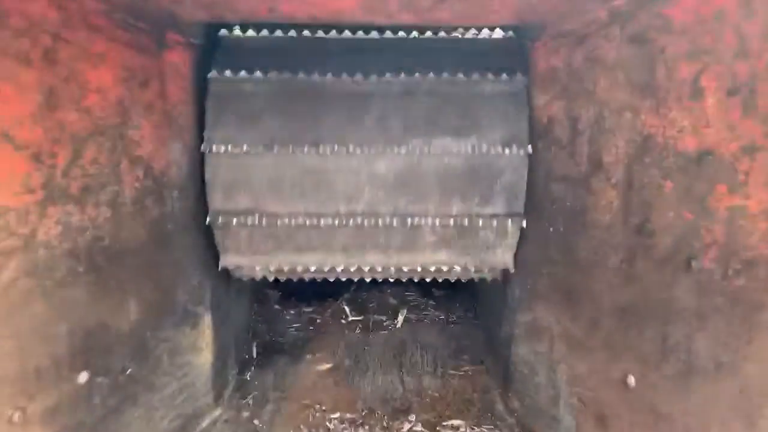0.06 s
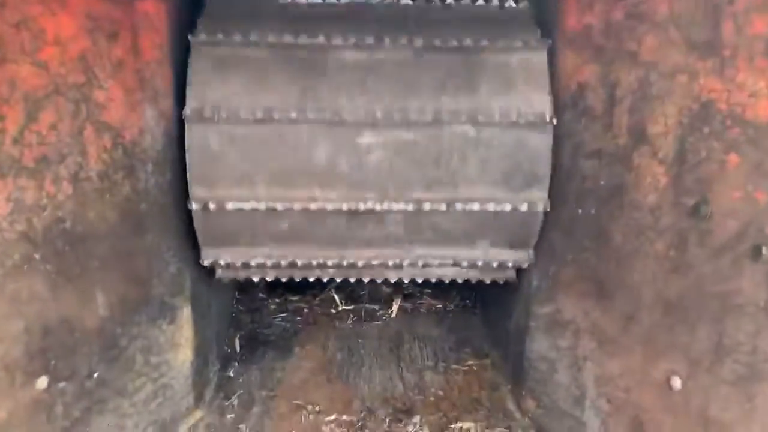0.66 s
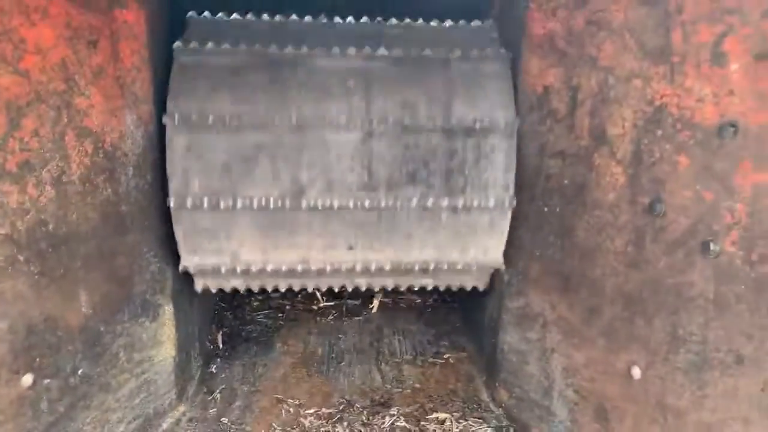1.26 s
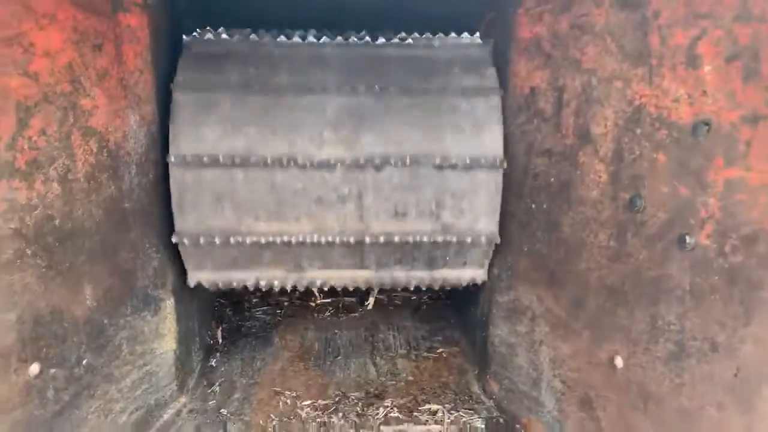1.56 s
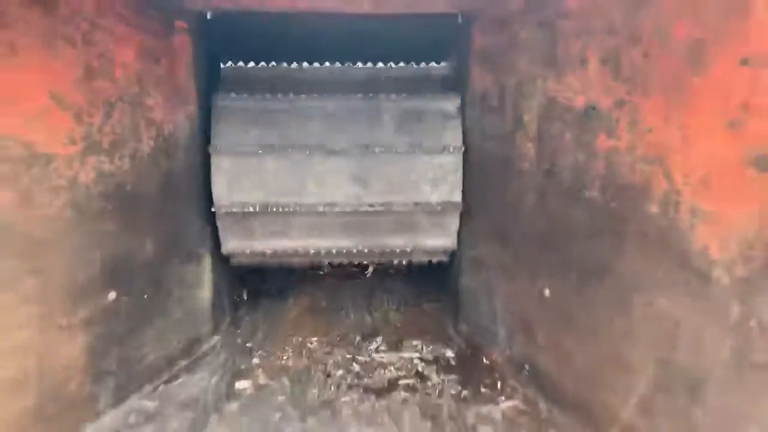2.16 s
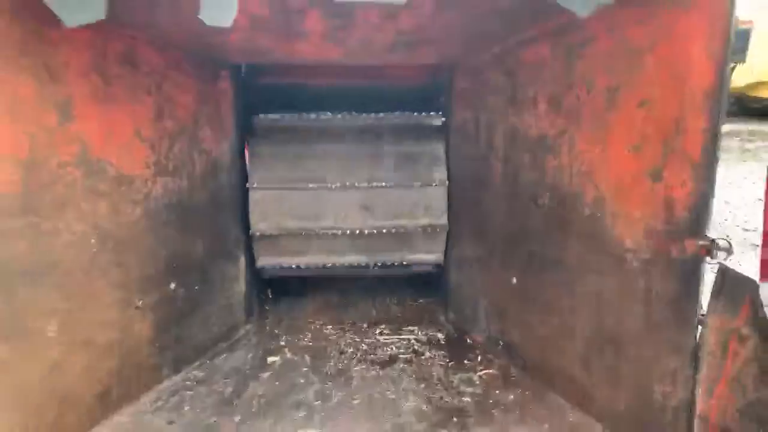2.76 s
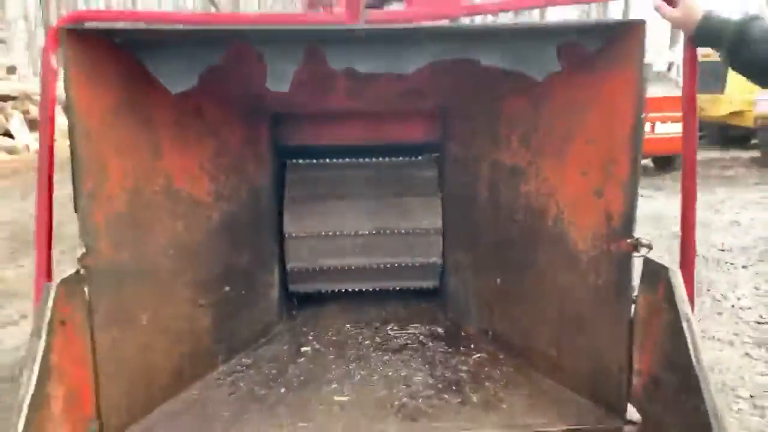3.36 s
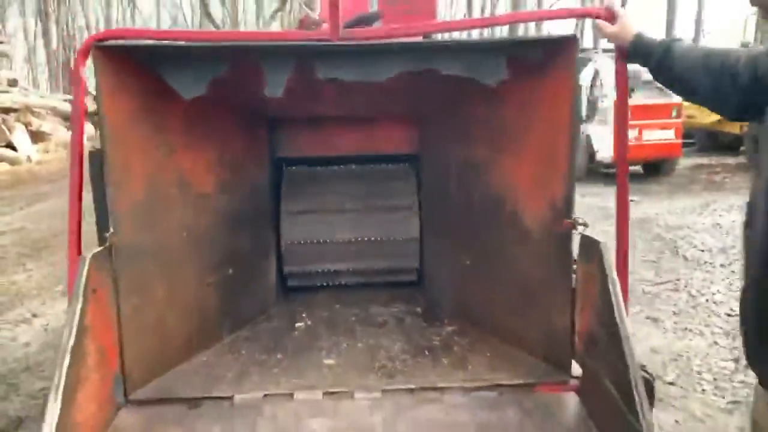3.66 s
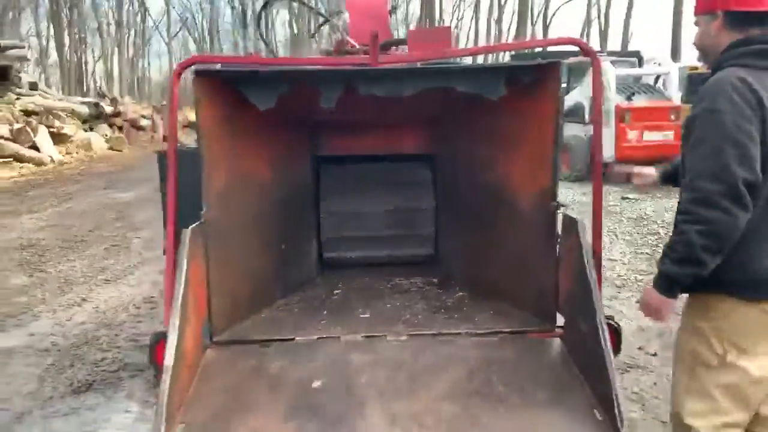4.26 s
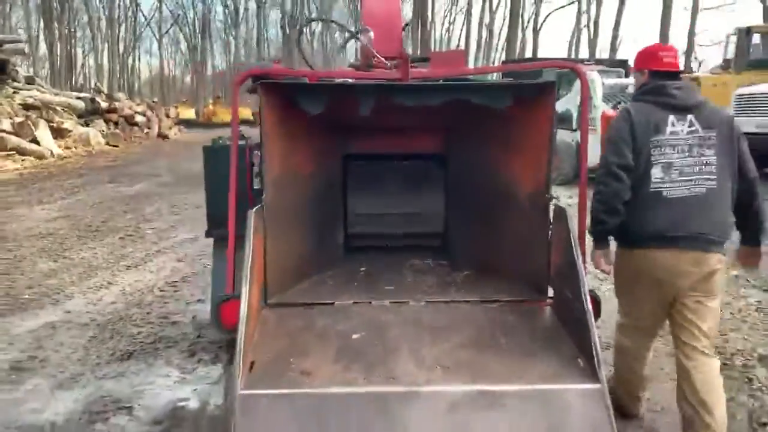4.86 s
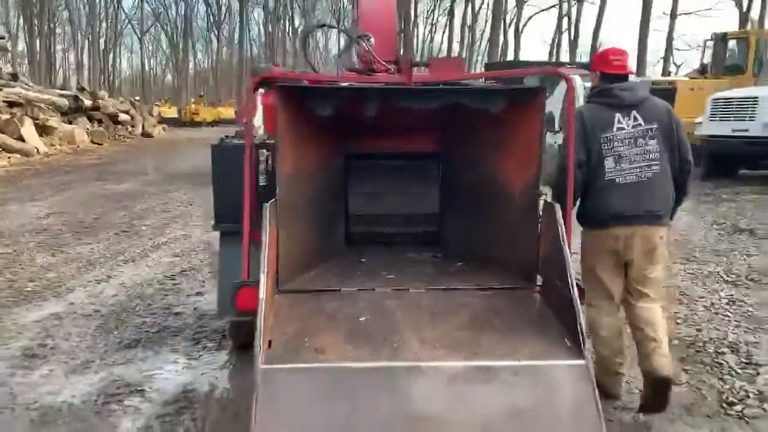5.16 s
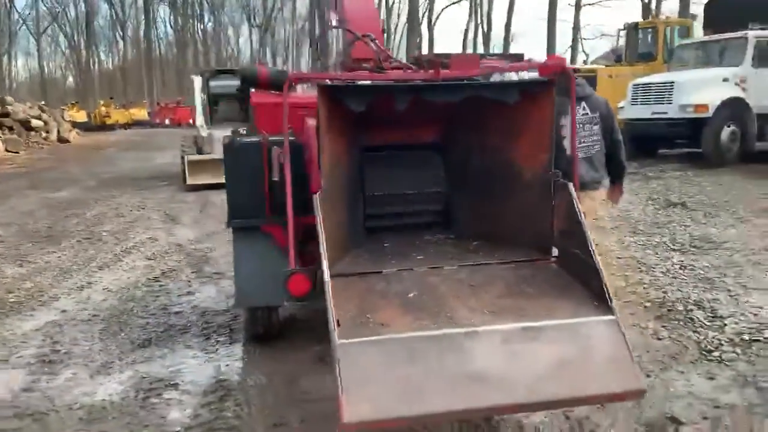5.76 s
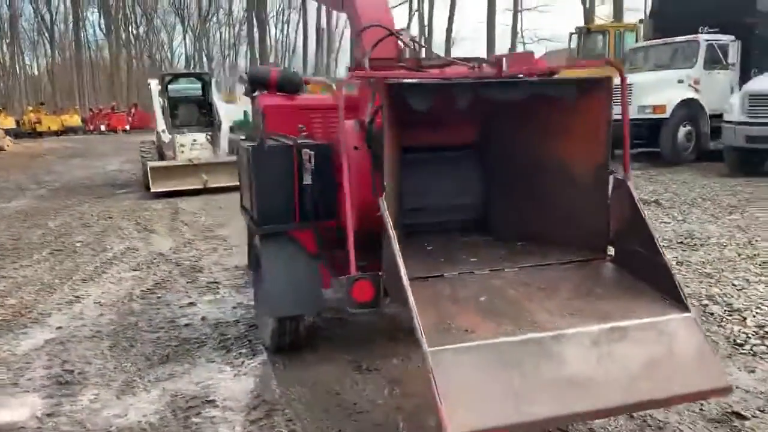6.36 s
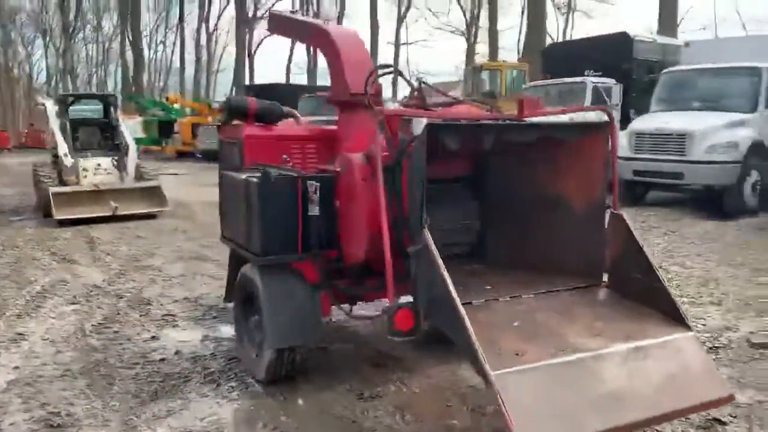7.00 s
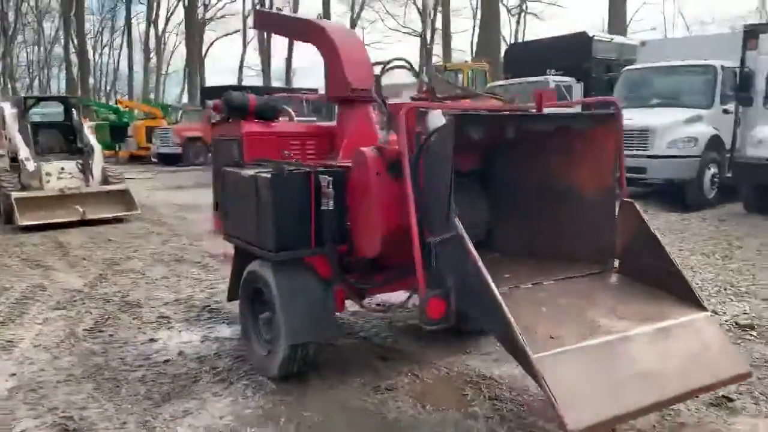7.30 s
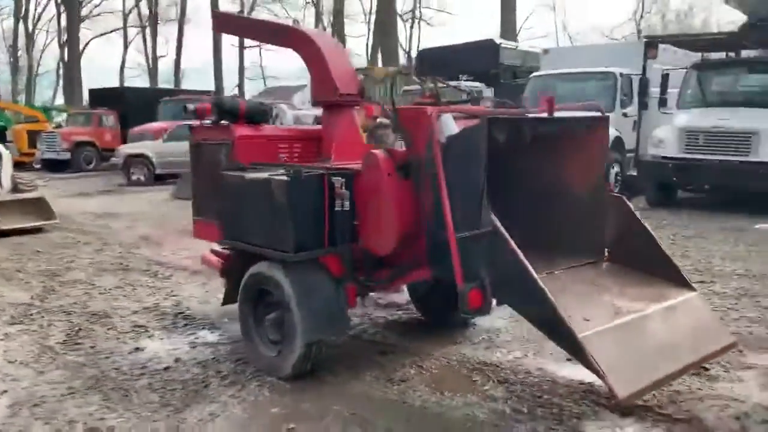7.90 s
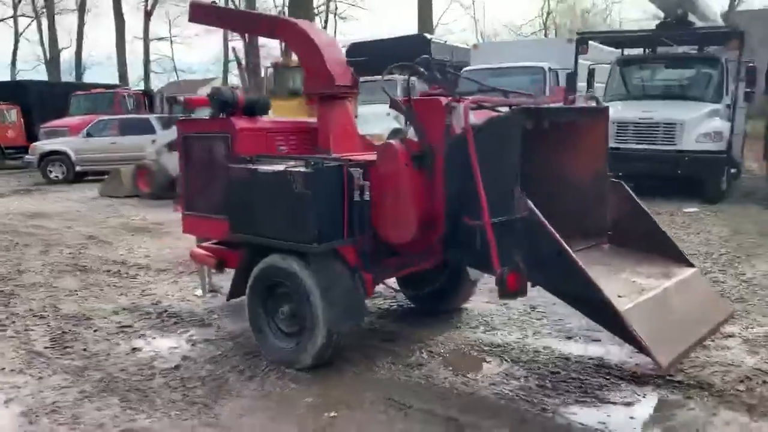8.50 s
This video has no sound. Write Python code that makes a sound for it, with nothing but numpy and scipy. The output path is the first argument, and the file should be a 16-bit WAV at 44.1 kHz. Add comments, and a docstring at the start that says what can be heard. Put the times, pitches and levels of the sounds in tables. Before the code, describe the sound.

A wood chipper drones and throbs as it winds down to idle, with a metallic hiss, small ticks and a couple of clanks.

```python
"""A drum chipper winds down to idle in a yard as the listener backs out of its steel hopper and walks
round to its side. Two knives snap past the anvil and beat the air into the hopper's resonances; the
belted engine throbs and ticks at a fixed ratio to the drum. The steelwork booms as the listener passes.
Chips tick and the feed roller hisses until it stops with a clank; later, loose fittings chink and
gravel shifts underfoot."""
import sys
import numpy as np
from scipy import signal
from scipy.fft import rfft, irfft, next_fast_len
from scipy.io import wavfile
from scipy.ndimage import uniform_filter1d, map_coordinates

SR = 44100
rng = np.random.default_rng(int(sys.argv[2]) if len(sys.argv) > 2 else 0)


def store_pcm(level_fs):
    """Save levels as 16-bit WAV."""
    pcm = np.round(np.clip(level_fs, -1, 1) * 32767).astype(np.int16)
    wavfile.write(sys.argv[1], SR, np.atleast_2d(pcm).T)


N = 381024
TIME_S = np.arange(N) / SR
APPROACH_S = 5.18  # the engine starts to come out from behind the hopper


def amp(db):
    """Decibels to gain."""
    return 10 ** (np.asarray(db) / 20)


def unit(x):
    """Scale to rms 1."""
    return x / np.sqrt(np.mean(x ** 2) + 1e-20)


def along(points, hz):
    """Read a curve of (freq_hz, value) points on a log frequency axis."""
    freqs, values = np.transpose(points)
    return np.interp(np.log(hz + 1), np.log(freqs + 1), values)


def wobble(rate):
    """A smooth random curve with `rate` knots a second."""
    knots = rng.standard_normal(int(N * rate / SR) + 4)
    return map_coordinates(knots, [np.arange(N) * rate / SR], order=2)


def filtered(x, response):
    """Shape x with a frequency response."""
    size = next_fast_len(N + SR // 2)
    return irfft(rfft(x, size) * response(np.fft.rfftfreq(size, 1 / SR)), size)[..., :N]


def coloured(x, colour):
    """EQ x with a (freq_hz, level_db) curve and scale to rms 1."""
    return unit(filtered(x, lambda hz: amp(along(colour, hz))))


def passing(peak_s, half_s, lift_db):
    """A lift in dB that swells and falls as the listener goes by."""
    return lift_db * np.exp(-((TIME_S - peak_s) / half_s) ** 2)


# The listener's standpoints at the hopper's throat, mouth, front and side: time_s
STANDPOINTS = [.8, 2.85, 4.25, 7.0]


def on_the_way(values, t=TIME_S):
    """Glide through one value per standpoint."""
    return np.interp(t, STANDPOINTS, values)


def walk(x, spectra, ripple_db=0, size=8192, ripple_bins=9, ripple_frames=4):
    """An EQ that glides between standpoints; echoes off the steel can add a fine, shifting ripple."""
    hz, t, frames = signal.stft(x, SR, nperseg=size)
    ripple = uniform_filter1d(rng.standard_normal((len(t), len(hz))), ripple_bins)
    ripple = unit(uniform_filter1d(ripple, ripple_frames, axis=0))
    shares = np.array([on_the_way(row, t) for row in np.eye(len(spectra))])
    eq_db = ripple_db * ripple + shares.T @ [along(points, hz) for points in spectra]
    cepstra = irfft(np.log(amp(eq_db)))
    causal = np.r_[1, np.full(size // 2 - 1, 2), 1, np.zeros(size // 2 - 1)]  # ring follows the hit
    log_gain = rfft(cepstra * causal)
    return signal.istft(frames * np.exp(log_gain.T), SR, nperseg=size)[1][..., :N]


# How alike the two ears are: freq_hz, correlation
EAR_LIKENESS = [(60, 0.9), (290, 0.94), (640, 0.75), (1400, 0.95), (3100, 0.057), (6800, 0.064),
                (9000, 0.46), (11000, 1)]


def stereo_noise():
    """White noise of rms 1, widest in the lower treble and nearly mono in the bass and at the top."""
    def mid_side(hz):
        angle = np.arccos(np.clip(along(EAR_LIKENESS, hz), -1, 1)) / 2
        return np.array([np.cos(angle), np.sin(angle)])
    mid, side = filtered(rng.standard_normal((2, N)), mid_side)
    return np.array([mid + side, mid - side])


def coasting(base_hz=55.215, sag_hz_per_s=1.279, drop_hz=5.697, drop_at_s=4.475, drop_half_s=1.919):
    """Knife passes per second: the heavy drum sags steadily and drops further as the throttle closes."""
    throttle_closed = (1 + np.tanh((TIME_S - drop_at_s) / drop_half_s)) / 2
    return base_hz - sag_hz_per_s * TIME_S - drop_hz * throttle_closed


# Tone of the knife beat at each standpoint: pitch_hz, level_db
BEAT_THROAT = [(54, -32), (108, -23), (162, -20), (215, -23), (270, -23), (322, -18), (377, -30),
               (441, -28), (490, -34.5), (570, -40.5), (690, -43), (850, -51), (925, -37.5), (1030, -87),
               (1230, -43.5), (1900, -58)]
BEAT_MOUTH = [(51, -47), (102, -25.5), (153, -28.5), (204, -27), (255, -38), (308, -19.5), (357, -25.5),
              (408, -34), (490, -27), (600, -49.5), (1400, -54.5), (1900, -59)]
BEAT_FRONT = [(47, -87), (93, -34.5), (140, -58.5), (186, -40), (233, -36), (280, -43.5), (373, -41),
              (430, -35), (468, -29), (520, -47), (575, -38), (680, -63.5), (1030, -46.5), (1700, -87)]
BEAT_SIDE = [(42, -56), (82, -53), (119, -41.5), (165, -40.5), (200, -56), (245, -43), (275, -44.5),
             (315, -37), (355, -48.5), (400, -50.5), (470, -52), (1200, -65)]
# Once-a-turn partials against the knife beat, per standpoint: offset_db
TURN_DB = [-17.5, -20.5, -9, -5.5]
# Blur from stray echoes at 500 Hz, per standpoint: phase_spread_rad
ECHO_BLUR = [.15, .2, .45, 1.6]
# Hopper resonances that hold back and smear each pulse: pitch_hz, width_hz
HOPPER_MODES = [(78, 37), (215, 113), (300, 51.5), (760, 280)]
# Steelwork booms that swell in passing: pitch_hz, width_hz, peak_s, half_length_s, lift_db
BOOMS = [(55, 20, 0.1, 0.8, 2), (80, 18, 0.91, 1.4, 11), (106, 24, 1.63, 0.62, 3),
         (383.5, 39, 1.7, 0.97, 6.5), (476, 85, 0.26, 0.68, 11), (356, 160, 3.46, 0.48, 3.5),
         (168.2, 26, 4.14, 1, 28), (308, 48, 5.4, 0.8, 9.5), (306, 67, 6.37, 0.47, 4.5),
         (167.3, 12, 6.21, 0.56, 9.5), (264, 37, 6.55, 0.26, 9.5), (339, 39, 6.42, 0.49, 8),
         (296, 16, 8.12, 0.74, 11), (398, 42, 7.5, 0.92, 10), (700, 200, .1, .5, 6.5),
         (225, 36, 5.3, 0.65, 4), (320, 40, 1.7, 0.55, 2.5), (385, 110, 4.94, .4, 3.5)]
# Hollows where a wall echo cancels the direct sound: pitch_hz, width_hz, peak_s, half_length_s, dip_db
HOLLOWS = [(255.5, 77, 2.38, 0.61, 8.5), (203, 40, 2.8, 0.51, 11), (424, 55, 1.87, 0.45, 9),
           (584, 64, 1.5, 0.32, 15), (540, 50, 3.54, 0.37, 9), (337, 43, 5.24, 0.2, 8),
           (500, 160, 8.4, 1, 13), (447, 54, 5.4, 0.63, 4.5)]


def knives(passes, rate_hz, travel_s=0.001585, waver_db_per_hz=1.9 / 500, step=7):
    """Two unequal knives beat the air: strong partials at the knife rate, weaker ones between them."""
    t, passes, rate_hz = TIME_S[::step], passes[::step], rate_hz[::step]
    bands = [(centre, width, passing(*swell)[::step]) for centre, width, *swell in BOOMS]
    bands += [(centre, width, -passing(*dip)[::step]) for centre, width, *dip in HOLLOWS]
    shares = [on_the_way(row, t) for row in np.eye(len(STANDPOINTS))]
    spectra = [BEAT_THROAT, BEAT_MOUTH, BEAT_FRONT, BEAT_SIDE]
    turn_db, blur = on_the_way(TURN_DB, t), on_the_way(ECHO_BLUR, t)
    beat = np.zeros(len(t))
    for k in range(2, 48):  # harmonics of one drum turn
        hz, odd = k / 2 * rate_hz, k % 2
        db = odd * turn_db + sum(share * along(points, hz) for share, points in zip(shares, spectra))
        db += sum(lift / (1 + (2 * (hz - centre) / width) ** 4) for centre, width, lift in bands)
        # short waves waver most as the listener moves through their standing pattern
        db += waver_db_per_hz * hz * map_coordinates(rng.standard_normal(64), [t * 4], order=2)
        lag = 2 * np.pi * hz * travel_s
        lag += sum(2 * np.arctan2(hz * width, centre ** 2 - hz ** 2) for centre, width in HOPPER_MODES)
        echo_phase = rng.standard_normal() * (np.pi if odd else blur * hz.mean() / 500)
        beat += amp(db) * np.sqrt(2) * np.cos(np.pi * k * passes - lag + echo_phase)
    return signal.resample_poly(beat, step, 1)[:N]


# EQ of a knife's snap at the anvil: freq_hz, gain_db
SNAP_COLOUR = [(300, -36), (650, -18), (900, 5.5), (1000, -7.5), (1220, 4), (1600, 9), (1900, -2),
               (2700, -11.5), (4000, -17), (8000, -21), (15000, -47)]
# Snap fader, per standpoint: level_db
SNAP_DB = [-37.5, -44, -50, -53]


def snaps(passes, rate_hz, spit_decay_s=0.0013, weaker_db=2, scatter_db=1.5, crack_db=18):
    """Each knife skims the anvil with a hard crack and a spit of air; one sits closer than the other."""
    hit = passes.astype(int)
    hit_db = scatter_db * rng.standard_normal(hit[-1] + 1)[hit] - weaker_db * (hit % 2 == 0)
    crack = amp(crack_db) * np.diff(hit, prepend=hit[0])
    spit = stereo_noise() * np.exp(-(passes % 1) / rate_hz / spit_decay_s)
    snap = unit(walk(amp(hit_db) * (crack + spit), [SNAP_COLOUR] * len(STANDPOINTS)))
    up_close_db = passing(peak_s=1.4, half_s=0.36, lift_db=3.8)
    return amp(on_the_way(SNAP_DB) + up_close_db) * snap


# Turbulence in the drum housing, from inside and outside the hopper: freq_hz, density_db
RUMBLE_IN = [(25, -70), (45, -62), (72, -58), (96, -44.5), (130, -54), (168, -44), (210, -57), (320, -51.5),
             (430, -55), (600, -62), (900, -81), (2000, -130)]
RUMBLE_OUT = [(25, -74), (40, -63), (56, -56), (80, -54), (130, -59.5), (170, -54), (220, -57.5),
              (300, -55), (380, -59.5), (500, -64.5), (800, -84), (2000, -130)]
# EQ of the thrown air inside, in front of and beside the hopper: freq_hz, gain_db
WHOOSH_IN = [(350, -21), (600, -4.5), (729, -2), (941, -9.5), (1020, -10.5), (1210, -11), (1350, -12),
             (1450, -8.5), (1860, -18), (2190, -15), (3600, -32), (4680, -39), (7920, -120)]
WHOOSH_FRONT = [(360, -24), (620, -3.5), (653, -6.5), (790, -0.5), (936, -17), (1030, -1.5), (1130, -6.5),
                (1500, -6.5), (2200, -16), (2640, -22), (3600, -30.5), (4680, -62), (7920, -120)]
WHOOSH_SIDE = [(350, -28.5), (500, -16), (600, -6), (708, -4.5), (768, -3.5), (1160, -6.5), (1220, -7),
               (1750, -7.5), (1930, -11.5), (2370, -12), (2830, -20), (3600, -31.5), (4680, -63),
               (7920, -120)]
# Rumble and whoosh faders, per standpoint: gain_db
RUMBLE_DB = [1.1, -1, -1.5, -2.5]
WHOOSH_DB = [-27, -32, -33, -37.5]


def draught(passes):
    """The drum works as a fan: a rumble surges behind each knife, and four paddles chop a whoosh."""
    surge = unit(puffs(passes, decay_cycles=1.0, scatter_db=3) ** on_the_way([0.89, 1, 0.3, 0]))
    turbulence = stereo_noise() * surge * np.sqrt(SR / 2)
    rumble = walk(turbulence, [RUMBLE_IN, RUMBLE_IN, RUMBLE_OUT, RUMBLE_OUT])
    by_housing_db = passing(peak_s=6.5, half_s=0.41, lift_db=2.4)
    depth = 0.34 * on_the_way([0.85, 0.63, 0.73, 0.19])
    chop = np.sqrt(1 - depth + depth * puffs(2 * passes, decay_cycles=0.69, scatter_db=5.5) ** 2)
    whoosh = walk(stereo_noise() * chop, [WHOOSH_IN, WHOOSH_IN, WHOOSH_FRONT, WHOOSH_SIDE], ripple_db=2.5)
    whoosh_db = on_the_way(WHOOSH_DB) + 0.38 + 0.85 * wobble(12)
    return amp(on_the_way(RUMBLE_DB) + by_housing_db) * rumble + amp(whoosh_db) * unit(whoosh)


def puffs(cycles, decay_cycles, scatter_db):
    """An envelope of rms 1 that jumps to a random height once a cycle, then decays."""
    heights = amp(scatter_db * rng.uniform(-1, 1, int(cycles[-1]) + 1))
    return unit(heights[cycles.astype(int)] * np.exp(-(cycles % 1) / decay_cycles))


# Faders of the firing tone and its octave, per standpoint: level_db
FIRING_DB = [-36.5, -39.5, -35, -37.5]
OCTAVE_DB = [-43, -36, -85, -38]


def exhaust(passes, firings, sum_peak_db=-22, sum_peak_s=2.3, sum_fade_db_per_s=11.5):
    """The engine's firing tone and octave; firing shakes the drum's second partial into a sum tone."""
    by_engine_db = passing(peak_s=8.7, half_s=0.9, lift_db=3.1)
    sum_db = sum_peak_db - sum_fade_db_per_s * np.abs(TIME_S - sum_peak_s)  # peaks just inside the mouth
    tones = [(on_the_way(FIRING_DB), firings),
             (on_the_way(OCTAVE_DB) + by_engine_db, 2 * firings),
             (sum_db, firings + 2 * passes)]
    return sum(amp(db + 0.71 * wobble(7.7)) * np.sqrt(2) * np.sin(2 * np.pi * cycles)
               for db, cycles in tones)


# Base fader of the metallic hiss, per standpoint: gain_db
HISS_DB = [-48.5, -52.5, -52.5, -56]


def hiss_fader(roller_db=3, roller_stop_s=2.3, runout_s=0.4, approach_db_per_s=2.5):
    """Hiss gain in dB: it drops as the feed roller stops and grows as the engine comes into view."""
    rolling = np.clip(1 - (TIME_S - roller_stop_s) / runout_s, 0, 1)
    approach_db = approach_db_per_s * np.maximum(TIME_S - APPROACH_S, 0)
    return on_the_way(HISS_DB) + roller_db * rolling + approach_db


# EQ of the metallic hiss inside and outside the hopper: freq_hz, gain_db
HISS_IN = [(2000, -0.5), (3300, 3.5), (3900, 0), (4300, 3.5), (5400, -4.5), (6400, -1), (7100, -5),
           (7900, -2), (10000, -7), (12100, -8), (14500, -13), (15700, -23)]
HISS_OUT = [(2000, -36), (3300, -9), (3650, -0.5), (4450, 2.5), (5200, -2.5), (6500, -0.5), (7600, -6),
            (8600, -4), (11000, -11), (14000, -13.5), (15700, -16)]


def clatter(passes, firings, hiss_db, grit_db=0.5):
    """Gritty metallic hiss: chips fly round once a turn in the hopper; injectors tick by the engine."""
    inside, beside = on_the_way([0.8, 0.28, 0.39, 0.088]), on_the_way([0, 0, 0, 1])
    chips = 0.84 * inside * puffs(passes / 2, decay_cycles=0.33, scatter_db=5) ** 2
    injectors = 0.31 * beside * puffs(firings, decay_cycles=0.36, scatter_db=2) ** 2
    envelope = np.sqrt(1.5 + chips + injectors) * amp(grit_db * wobble(2500))
    hiss = walk(stereo_noise() * envelope, [HISS_IN, HISS_IN, HISS_OUT, HISS_OUT], ripple_db=2.5)
    return amp(hiss_db + 2.0 + 1.1 * wobble(32)) * unit(hiss)


# The standout ticks of chips and grit, before the boost: start_s, click_db, fizz_db
TICKS = [(0.016, -46, -41), (0.0862, -47, -43), (0.1201, -42, -44.0), (0.3193, -54, -54.0),
         (0.451, -43, -51.5), (0.4853, -47.0, -48.0), (0.5932, -49, -48.5), (1.0784, -43, -47.5),
         (1.2646, -48, -51), (1.3773, -41, -47.0), (1.455, -42, -53.0), (1.5668, -44, -43),
         (1.719, -46, -48), (1.794, -46, -47), (1.8696, -55.0, -44), (1.9067, -52, -51.0),
         (2.0693, -58.0, -47), (2.0981, -47.0, -48.0), (2.857, -47.5, -60), (3.029, -53, -57.5),
         (3.7943, -49, -58.5), (4.1705, -53, -58.5), (4.373, -56, -55), (4.5825, -52, -51),
         (5.0135, -50, -51), (5.3388, -49, -49), (5.9989, -55.5, -53), (6.3346, -56, -58.0),
         (6.9951, -48, -53.5), (7.4385, -41, -47), (8.1096, -50.0, -55.0), (8.5784, -39, -43)]
# EQ of a tick's click and of its fizz: freq_hz, gain_db
CLICK_COLOUR = [(1500, -24), (4200, 4.5), (5400, 2), (6400, 6), (8000, 0.5), (10000, -10), (15500, -35)]
FIZZ_COLOUR = [(5000, -35), (8000, -2), (10000, -1), (13000, 0.5), (15500, -2)]


def ticks(hiss_db, t60_s=0.077, boost_db=3, faint_count=420, spread_db=10):
    """Chips snap against the feed roller and grit against stone, each a burst of click and fizz."""
    t, envelopes = np.arange(SR // 4) / SR, np.zeros((2, N + SR))
    faint_db = np.array([-10, -15])  # click and fizz of the faint ticks, against the hiss fader
    faint = [(at / SR, *(hiss_db[at] + faint_db - spread_db * rng.random(2)))
             for at in rng.integers(0, N, faint_count)]
    burst = amp(boost_db - 60 * t / t60_s) * (1 - np.exp(-t / 0.0004))
    for start_s, *levels_db in list(TICKS) + faint:
        start = round(start_s * SR)
        envelopes[:, start:start + len(t)] += amp(levels_db)[:, None] * burst
    grit = stereo_noise() * amp(2.5 * wobble(2000))
    flat = [[(1000, 0)]] * len(STANDPOINTS)
    # a fast-shifting ripple lets each bit ring in its own way
    grit = walk(grit, flat, ripple_db=5, size=512, ripple_bins=4, ripple_frames=12)
    click, fizz = envelopes[:, :N]
    return click * coloured(grit, CLICK_COLOUR) + fizz * coloured(grit, FIZZ_COLOUR)


# Blows of the feed control linkage: start_s, level_db, crash_t60_s, ring_db, treble_db
CLANKS = [(2.4437, -21.5, 0.085, -4, 1.5), (2.456, -33, 0.13, 3, -6), (2.489, -35, 0.1, -9, 1),
          (2.534, -29.5, 0.13, -10, 0), (3.566, -28, 0.15, -2, -12), (3.628, -39, 0.22, -10, 5)]
# EQ of their crash: freq_hz, gain_db
CRASH_COLOUR = [(300, -14), (900, -5), (1300, -6), (1700, 3), (2300, 3), (3400, -1), (4400, -5),
                (5300, -19), (6500, -11), (10000, -13), (15500, -22)]
# Ringing modes of the struck steel: pitch_hz, level_db, t60_s
STEEL_MODES = [(1635, 5, .1), (2110, -4, .13), (2353, -1, .1), (3575, -10, .08), (4264, -15, .08),
               (6180, -12, .22), (7009, -13, .1), (11770, -27, .2)]


def clanks(grit_db=3, crossover_hz=3200):
    """The linkage strikes its stops: a rattling crash and ringing steel, each blow with its own treble."""
    t, out = np.arange(SR // 2) / SR, np.zeros((2, N + SR))
    crash = coloured(stereo_noise() * amp(grit_db * wobble(1500)), CRASH_COLOUR)
    crossover = [signal.butter(3, crossover_hz, kind, fs=SR, output="sos") for kind in ("low", "high")]
    attack = 1 - np.exp(-t / 0.002)
    for start_s, level_db, t60_s, ring_db, treble_db in CLANKS:
        start = round(start_s * SR)
        ring = 0
        for hz, mode_db, mode_t60_s in STEEL_MODES:
            decay = amp(mode_db + rng.normal(0, 2.7) - 60 * t / mode_t60_s)
            ring += decay * np.sin(2 * np.pi * (hz * t + rng.random((2, 1))))
        blow = crash[:, start:start + len(t)] * amp(-60 * t / t60_s) + amp(ring_db) * ring
        body, treble = [signal.sosfilt(band, blow) for band in crossover]
        out[:, start:start + len(t)] += amp(level_db) * (body + amp(treble_db) * treble) * attack
    return out[:, :N]


# Rings of the loose fittings: pitch_hz
CHINK_HZ = [4370, 4700, 6400]


def chinks(hiss_db, offset_db=-3, spread_db=12, detune=0.065, t60_s=0.077, count=260):
    """Loose guards and chains shiver on the running machine: tiny rings, heard outside the hopper."""
    t, out = np.arange(SR // 8) / SR, np.zeros((2, N + SR))
    envelope = amp(-60 * t / t60_s) * (1 - np.exp(-t / 0.001))
    for when, softness, part, pitch, ear_phase in rng.random((count, 5)):
        start = int(np.interp(when, [0, 1], [APPROACH_S * SR, N - 1]))
        hz = CHINK_HZ[int(part * len(CHINK_HZ))] * (1 + detune * (2 * pitch - 1))
        ring = np.sin(2 * np.pi * (hz * t + np.array([[0], [ear_phase]]))) * envelope
        out[:, start:start + len(t)] += amp(hiss_db[start] + offset_db - spread_db * softness) * ring
    return out[:, :N]


# Soles dragging on gravel: peak_s, level_db, half_length_s
SCUFFS = [(5.75, -57, 0.11), (6.064, -54.5, 0.16)]
# EQ of the gravel: freq_hz, gain_db
GRAVEL_COLOUR = [(2000, -40), (3400, -10), (4400, 6), (5400, -13), (8000, -23), (15000, -41)]


def scuffs(grit_db=4):
    """Gravel shifts under a sole in a soft, gritty swell."""
    swell = sum(amp(db) * np.exp(-((TIME_S - peak_s) / half_s) ** 2) for peak_s, db, half_s in SCUFFS)
    return swell * coloured(stereo_noise() * amp(grit_db * wobble(150)), GRAVEL_COLOUR)


# The drum's pan, per standpoint: left_minus_right_db
PAN_DB = [2.5, 2.5, 1.4, 0.27]


def place_drum(drum, shadow_hz=220, left_lag_s=7e-5):
    """The drum is a little louder on the left, except in the deep bass, and arrives there a hair later."""
    pan_db = on_the_way(PAN_DB)
    shaded = filtered(drum, lambda hz: np.minimum(hz / shadow_hz, 1))
    panned = drum + shaded * (amp([pan_db / 2, -pan_db / 2]) - 1)
    return filtered(panned, lambda hz: np.exp(1j * np.pi * left_lag_s * np.array([-hz, hz])))


def scene(firings_per_pass=1.21):
    """One falling shaft speed drives drum and belted engine; chips, steel and gravel sit on top."""
    rate_hz = coasting()
    passes = 1.37 + np.cumsum(rate_hz) / SR  # the drum starts partway through a turn
    firings = firings_per_pass * passes
    hiss_db = hiss_fader()
    drum = place_drum(knives(passes, rate_hz) + snaps(passes, rate_hz) + draught(passes))
    machine = drum + exhaust(passes, firings) + clatter(passes, firings, hiss_db)
    return machine + clanks() + ticks(hiss_db) + chinks(hiss_db) + scuffs()


def record(dry, top_hz=15750):
    """The microphone keeps nothing above its band limit."""
    return filtered(dry, lambda hz: hz < top_hz)


dry = scene()
out = record(dry)
store_pcm(out)
```